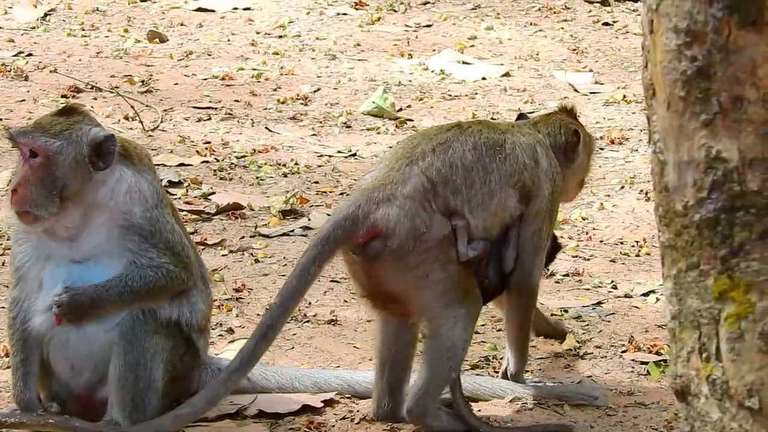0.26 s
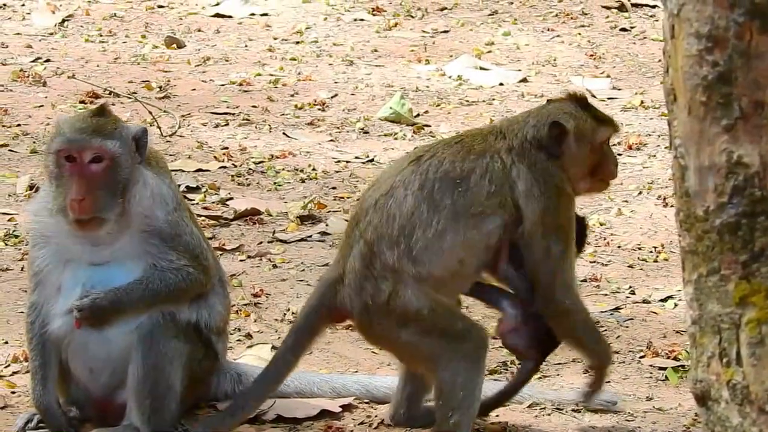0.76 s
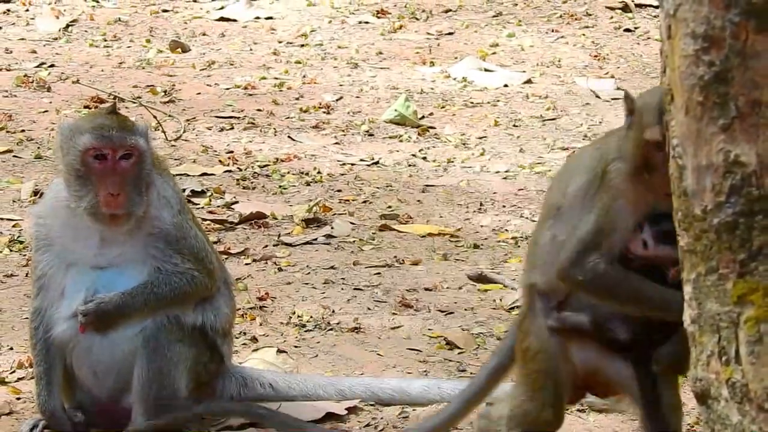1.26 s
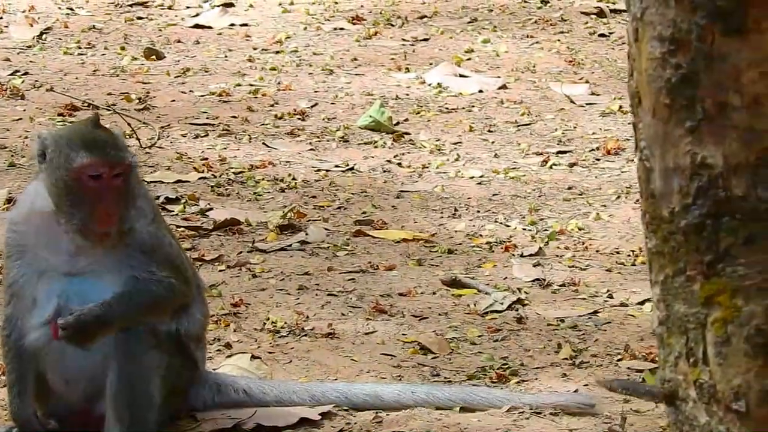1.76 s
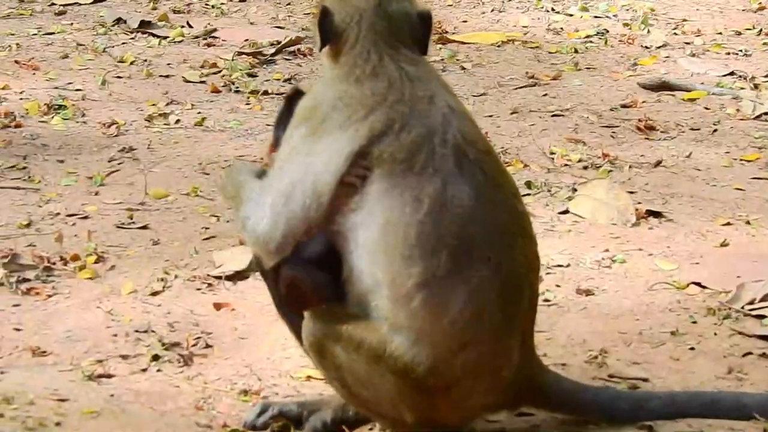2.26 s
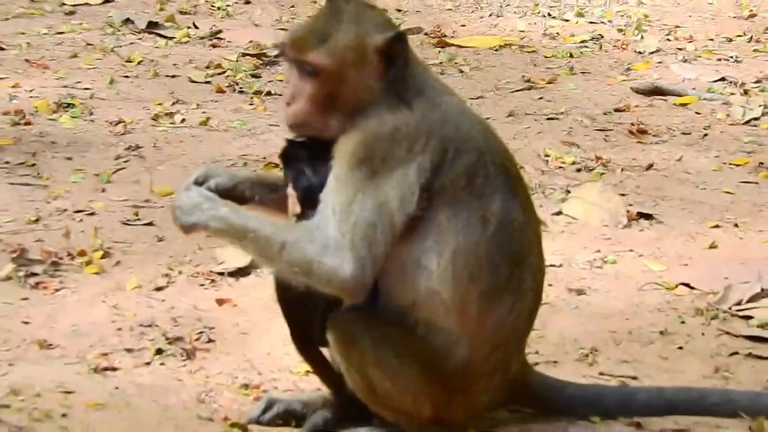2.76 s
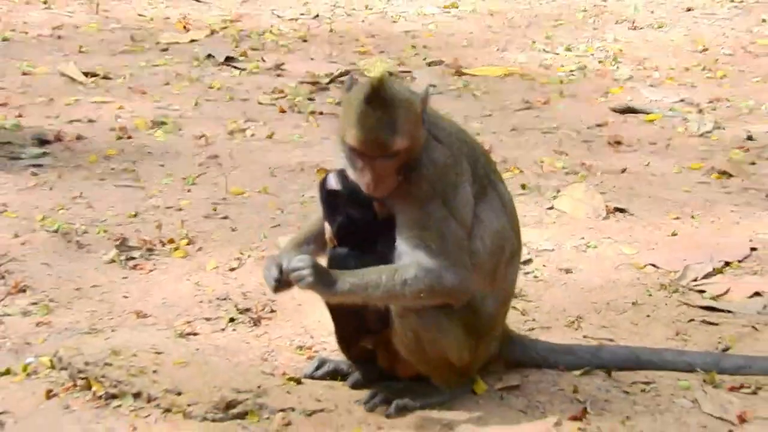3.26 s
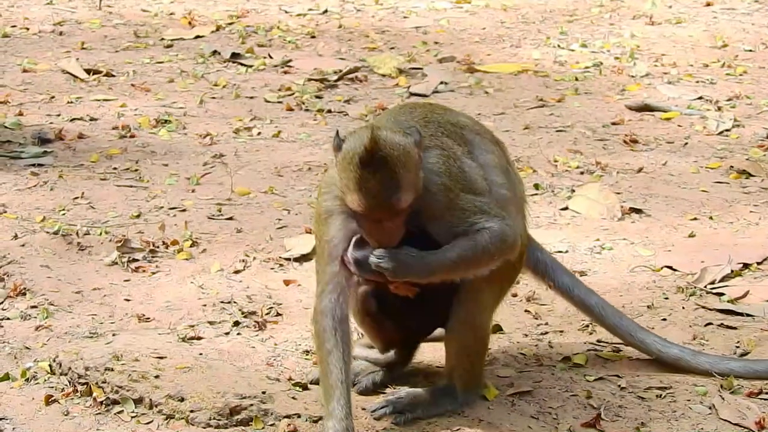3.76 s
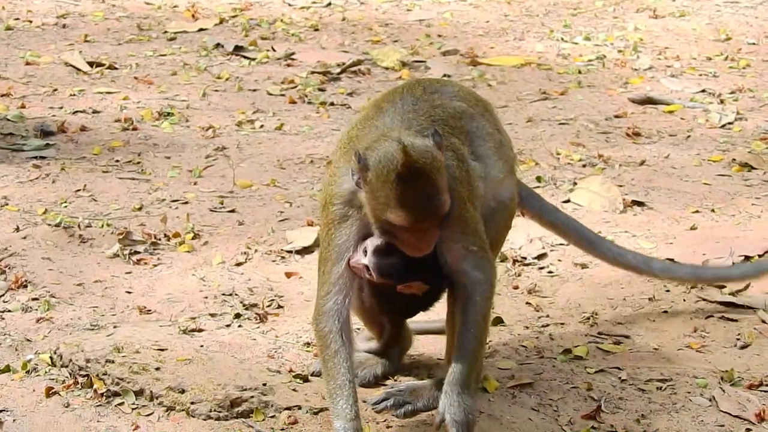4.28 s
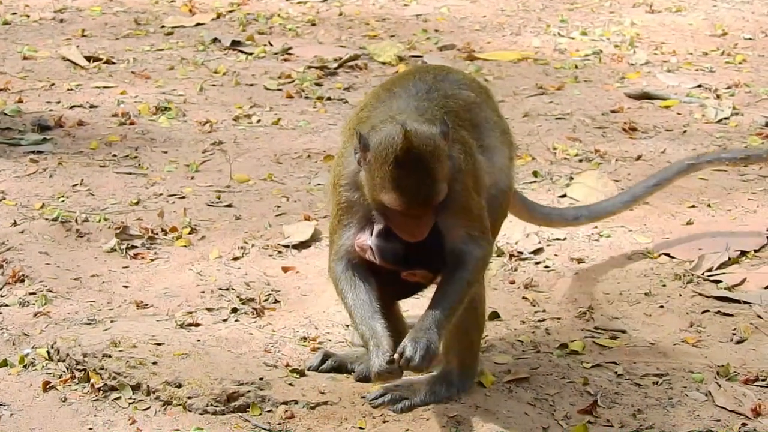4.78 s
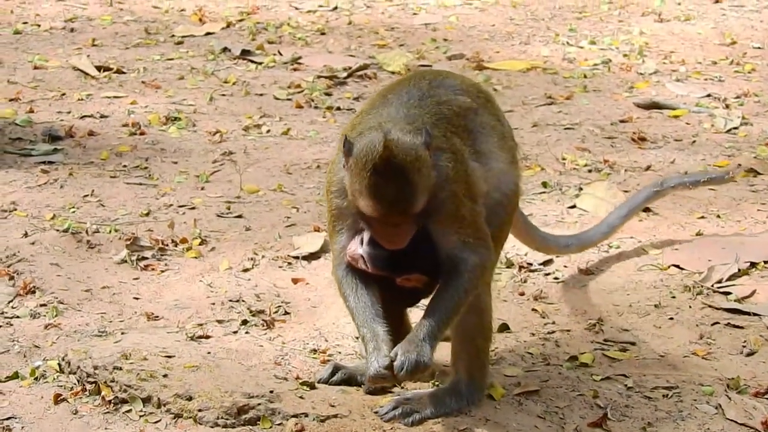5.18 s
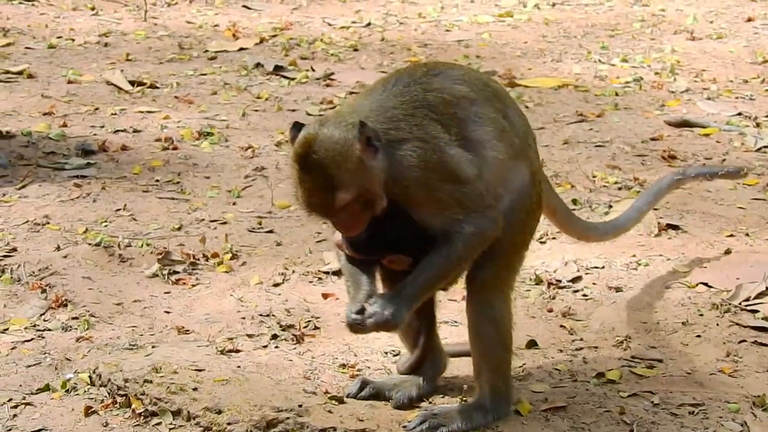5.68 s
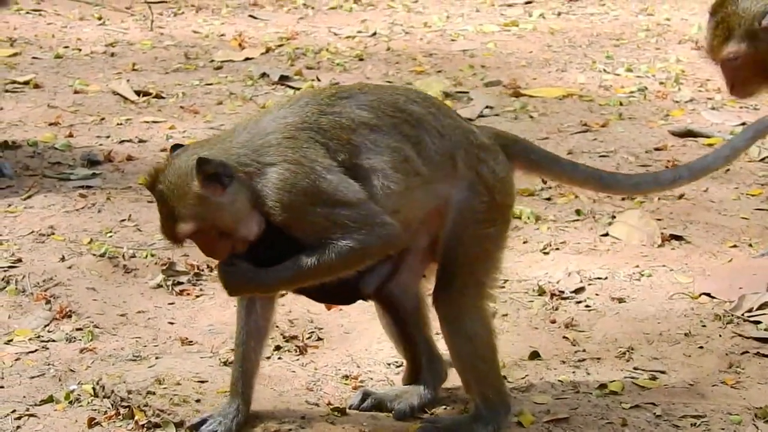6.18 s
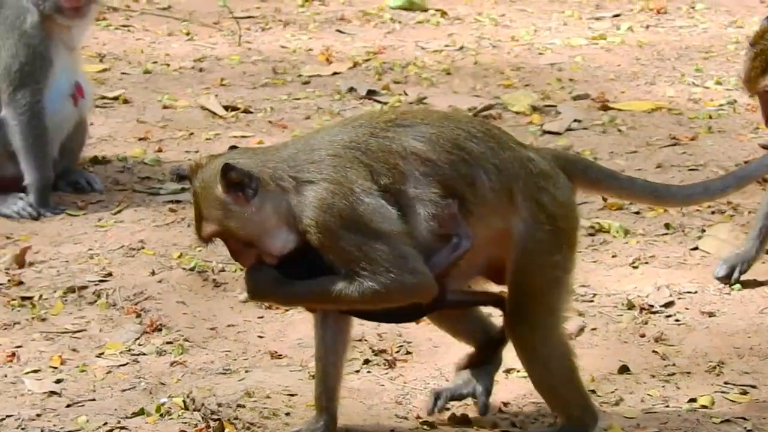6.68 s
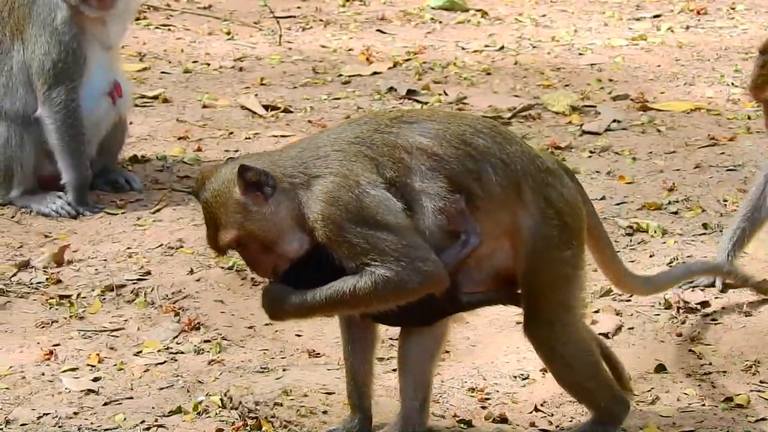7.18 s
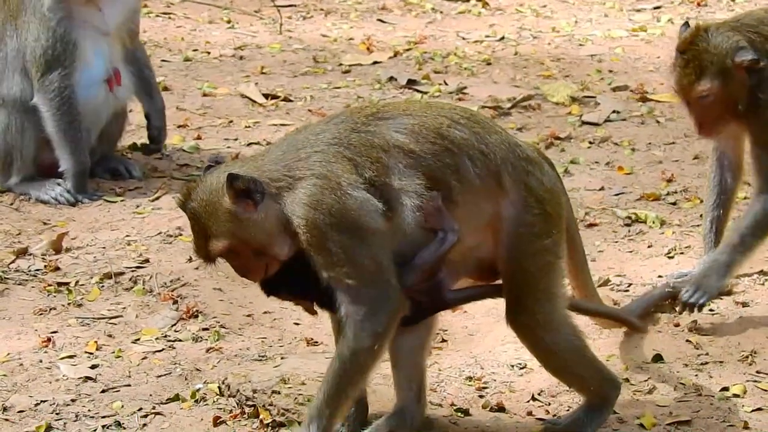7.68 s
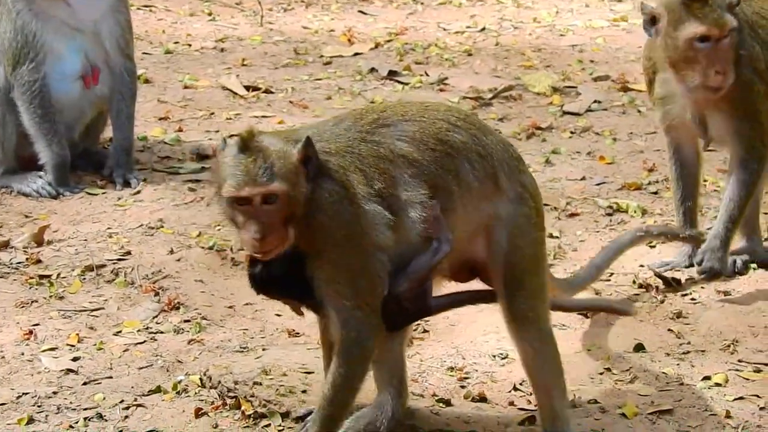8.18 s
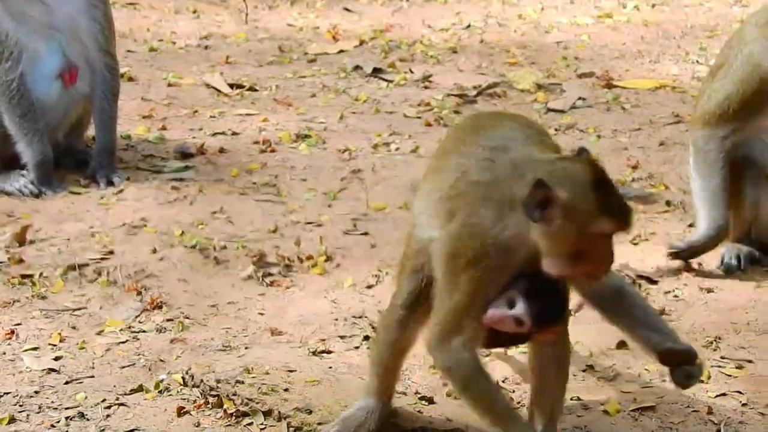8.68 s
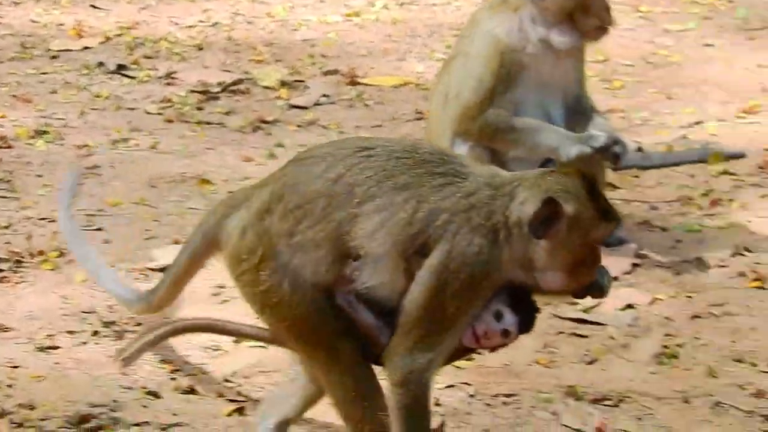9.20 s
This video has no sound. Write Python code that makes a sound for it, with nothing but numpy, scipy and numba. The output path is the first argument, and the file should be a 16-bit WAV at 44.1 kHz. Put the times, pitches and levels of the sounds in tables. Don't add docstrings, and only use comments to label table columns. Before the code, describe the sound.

Outdoor woodland in stereo: a steady low engine throb in the distance, dry leaf rustle and thin insect hiss. A young macaque shrieks and squeaks nearby, then everything drops silent briefly at a scene change. Denser screams and sliding whistles return, one turning into a voiced wail, with soft drooping coos further away. Another bout with a loud bark follows, then sharp twig cracks, quieter coos and a last dropping yelp.

```python
import sys
import numpy as np
from scipy import signal
from scipy.io import wavfile
from scipy.ndimage import uniform_filter1d
from numba import njit

SR = 44100
rng = np.random.default_rng(int(sys.argv[2]) if len(sys.argv) > 2 else 0)


def transcribe(signal):
    frames = np.atleast_2d(signal).T
    limited = np.clip(frames, -1, 1)
    pcm = np.round(limited * 32767).astype(np.int16)
    wavfile.write(sys.argv[1], SR, pcm)


def level_to_linear(level):
    exponent = np.asarray(level, float) / 20
    return 10 ** exponent


N = 416304


def rms_one(x):
    return x / np.sqrt(np.mean(x ** 2, axis=-1, keepdims=True) + 1e-20)


def at_hz(points, hz):
    table_hz, values = np.transpose(points)
    return np.interp(np.log(hz), np.log(table_hz), values)


def drift(rate_hz, size=N):
    r = np.exp(-2 * np.pi * rate_hz / SR)
    white = rng.standard_normal(size + 9000)
    slow = rms_one(signal.lfilter([1], [1, -2 * r, r * r], white))[9000:]
    return slow - slow.mean()


def butter(x, order, hz, kind="low"):
    return signal.sosfilt(signal.butter(order, hz, kind, fs=SR, output="sos"), x)


def unroll(call, fade_s):
    s, *columns = np.transpose(call)
    at = round(s[0] * SR)
    t = np.arange(at, min(round(s[-1] * SR), N)) / SR
    edges = np.clip(np.minimum(t - s[0], s[-1] - t) / fade_s, 0, 1)
    return at, edges, [np.interp(t, s, c) for c in columns]


@njit
def resonate(x, w, r):
    y = np.zeros(len(x))
    for i in range(2, len(x)):
        y[i] = x[i] - x[i - 2] + 2 * r * np.cos(w[i]) * y[i - 1] - r * r * y[i - 2]
    return y


def band(x, hz, width_hz, wander, tear_db, even_s=0.0054):
    hz = hz * np.exp(wander * drift(43, size=len(x)))
    w = 2 * np.pi * np.minimum(hz / SR, .4)
    for _ in range(2):
        x = resonate(x, w, np.exp(-np.pi * width_hz / SR))
    evened = x / np.sqrt(uniform_filter1d(x ** 2, int(even_s * SR)) + 1e-20)
    return level_to_linear(tear_db * drift(36, size=len(x))) * evened


def noisy_rings(rows, width_hz):
    out = np.zeros(N)
    for s, length, hz, db in rows:
        n, at = int(length * SR), round(s * SR)
        ring = band(rng.standard_normal(n), hz, width_hz, 0.03, tear_db=2.5)
        out[at:at + n] += level_to_linear(db) * np.hanning(n) ** .5 * ring
    return out


def voiced(calls, partials_db, waver=0.0039, flutter_db=5.5, fade_s=0.0027, smooth_s=.02,
           throat_db=0, dulling=0, flutter_hz=78, roll_db=0, roll_hz=7100):
    out = np.zeros(N)
    for call in calls:
        at, edges, (hz, db) = unroll(call, fade_s)
        n = len(hz)
        hz = uniform_filter1d(hz, int(smooth_s * SR) + 1, mode="nearest")
        hz = hz * (1 + waver * drift(60, size=n))
        phase = 2 * np.pi * np.cumsum(hz) / SR
        for k, partial_db in enumerate(partials_db, start=1):
            lift_db = throat_db / (1 + ((k * hz - 2400) / 200) ** 2)
            lift_db = lift_db - roll_db * np.maximum(k * hz - roll_hz, 0) / 1000 * (k > 1)
            effort_db = dulling * (k - len(partials_db)) * (db - db.max())
            level_db = db + partial_db + lift_db + effort_db + flutter_db * drift(flutter_hz, size=n)
            level = level_to_linear(level_db) * (k * hz < 16000)
            out[at:at + n] += np.sqrt(2) * edges * level * np.sin(k * phase + k * k)
    return out


def glides(rows, bend, start_db, end_db):
    out, u = [], np.linspace(0, 1, num=12)
    for s, length, from_hz, to_hz, db in rows:
        hz = from_hz + (to_hz - from_hz) * u ** bend
        level_db = db + start_db * (1 - u) ** 3 + end_db * u ** 3
        out.append(np.transpose([s + length * u, hz, level_db]))
    return out


# pitch_hz, density_db [dB per Hz]
AIR_DB = [(25, -26), (60, -10.5), (95, 5), (170, -5), (280, -22), (600, -22.5), (950, -28.5), (2500, -28.5),
          (3600, -29.5), (5600, -27.5), (7000, -31.5), (9000, -47), (16000, -37.5)]
# pitch_hz, likeness [0 to 1]
LIKENESS = [(60, .98), (250, .93), (600, .72), (1300, .74), (2400, .67), (4400, .52), (8000, .33),
            (15000, .05)]
# start_s, engine_nearness_db, tree_stir_db
AROUND = [(0, 2.5, -5), (1.761, 3, -5), (1.9, 0, 3), (3.4, 0, -0.5), (4.2, -3.5, -3.5), (4.9, -0.5, -2),
          (6.2, -4.5, -4), (8.14, -4.5, -4), (8.22, -4, -2), (8.5, -4.5, -6), (9.44, -5, -4.5)]


def surroundings(throb_hz=20.0, throb=0.37):
    t = np.arange(N) / SR
    before_gap = t < GAP_S[0]
    s, near_db, stir_db = np.transpose(AROUND)
    level_db = -43 + near_db, -54.5 + 0.78 * stir_db, -54 + 1.12 * stir_db
    edges = 25 * 2 ** np.arange(0, 9.4, 2 / 5)
    white = rng.standard_normal((2, 2, N))
    firing = 1 + throb * np.sin(2 * np.pi * np.cumsum(throb_hz * (1 + 0.042 * drift(1.0))) / SR)
    layers, gusts = np.zeros((3, 2, N)), drift(6.2)
    for k, (low, high) in enumerate(zip(edges, edges[1:])):
        mid, side = butter(white[k % 2], 2, [low, high], "band")
        hz = np.sqrt(low * high)
        alike = np.clip(at_hz(LIKENESS, hz), 0, 1)
        flicker_db = .7 * gusts + 1.9 * drift(9)
        shallow_db = -11.5 * before_gap / (1 + (hz / 107) ** 6)
        gain = level_to_linear(at_hz(AIR_DB, hz) + flicker_db) * level_to_linear(shallow_db)
        if hz < 300:
            gain = gain * firing
        stereo = np.sqrt(1 + alike) * mid + np.sqrt(1 - alike) * side * [[1], [-1]]
        layers[int(hz > 270) + int(hz > 2200)] += gain * stereo
    layers[2] = butter(layers[2], 3, 7600)
    lean_db = -1.0 + 0.1 * before_gap, -.6, -.4
    out = np.zeros((2, N))
    for layer, db, lean in zip(layers, level_db, lean_db):
        out += level_to_linear(np.interp(t, s, db)) * rms_one(layer) * level_to_linear(lean * np.array([[1], [-1]]))
    return out


def rustles(per_s=14, level_db=-62):
    out, t = np.zeros((2, N + 2048)), np.arange(2048) / SR
    for when, pitch, size, side, length in rng.random((200, 5))[:int(per_s * N / SR)]:
        hz, at = 350 * 2 ** (4.0 * pitch), int(when * N)
        puff = rms_one(butter(rng.standard_normal(2048), 2, [hz / 1.5, hz * 1.34], "band"))
        decay_db = -60 * t / (0.068 + .08 * length)
        puff = puff * level_to_linear(level_db + 13 * size ** 2 + decay_db) * np.clip(t / 0.0019, 0, 1)
        out[:, at:at + 2048] += puff * level_to_linear(14 * (side - .5) * np.array([[1], [-1]]))
    return out[:, :N]


# start_s, length_s, pitch_hz, level_db
CHEST = [
    (.508, 0.028, 3200, -41),
    (0.51, .05, 3500, -47.5),
    (0.68, .03, 2100, -55.5),
    (0.411, 0.031, 3230, -38.5),
    (1.254, 0.052, 3420, -35),
    (6.11, 0.026, 2850, -30.5),
    (6.193, 0.016, 2000, -38),
    (7.605, 0.036, 2600, -46),
    (8.912, 0.017, 3750, -47),
]


def chest_rings():
    return noisy_rings(CHEST, 450)


# start_s, length_s, level_db, mouth_hz, airy_top_db [above the mouth]
SHRIEKS = [(0.423, .07, -29, 6020, -10), (0.487, 0.04, -30.5, 6420, -12), (0.599, 0.033, -30, 5970, -7.5),
           (0.64, .048, -35, 5990, -7), (0.686, 0.11, -45.5, 6330, 1), (1.031, 0.052, -41, 5970, 1.5),
           (1.136, 0.057, -52.5, 6440, 13), (1.259, 0.033, -27, 5270, -14), (1.962, 0.041, -37, 6120, 2),
           (2.382, 0.026, -38, 6840, -2), (2.418, 0.017, -28, 6400, -1.5), (2.528, 0.045, -28.5, 5690, -18),
           (2.617, 0.068, -34.5, 5850, -1), (2.904, 0.039, -30, 6070, -2.5), (2.945, 0.059, -39, 6360, 4),
           (3.017, .06, -29.5, 5810, -11), (3.085, 0.12, -35.5, 5550, -16),
           (3.426, 0.031, -30.5, 5900, -10), (3.481, 0.027, -25, 6100, -16), (3.518, 0.033, -34, 5750, -9),
           (3.564, .04, -31.5, 6510, -16), (6.119, 0.027, -33.5, 5640, -38),
           (6.198, 0.024, -31.5, 5960, -17), (6.475, 0.092, -34.5, 6100, 3),
           (6.562, 0.084, -36, 6180, -7.5), (6.731, 0.14, -51, 7100, -9), (7.592, 0.034, -40, 6750, -4),
           (8.908, 0.018, -39.5, 5850, -12)]
# start_s, length_s, level_db, throat_hz, slide_octaves
RASPS = [(0.419, 0.018, -33.5, 3660, 0.47), (0.447, 0.037, -46.5, 4440, -0.082),
         (0.516, 0.036, -26, 4500, -0.039), (0.564, 0.049, -39.5, 4180, -0.026),
         (1.031, 0.044, -48.5, 3650, -0.032), (2.068, 0.015, -40, 4230, -0.061),
         (2.41, 0.026, -43, 3620, 0.015), (2.521, 0.063, -35, 3510, 0.29),
         (2.642, 0.036, -28, 4760, -0.099), (2.911, 0.027, -39, 3530, 0.023),
         (3.015, 0.051, -29, 3400, 0.23), (3.06, 0.11, -33.5, 4120, -0.12),
         (3.493, 0.056, -29.5, 3670, 0.062), (3.544, 0.056, -28.5, 3670, 0.041),
         (6.113, 0.038, -35, 3620, 0.35), (6.187, 0.02, -21.5, 3690, 0.035),
         (6.497, 0.03, -26, 4160, -0.041), (6.58, 0.05, -27, 3990, -0.019), (1.259, .03, -31.5, 4610, -.05),
         (6.733, 0.11, -46, 3920, 0.13), (6.826, 0.016, -27, 4320, 0.0069),
         (7.586, 0.037, -37.5, 3750, -0.058), (8.905, 0.022, -38.5, 2470, 0.04)]


def pushes():
    out, one = [], np.ones(4)
    shape_db = np.array([-13.5, 0, -3.5, -22])
    release_s = 0.0074
    attack_s, throat_db, throat_hz = 0.0063, -9, 4500
    for s, length, db, hz, top_db in SHRIEKS:
        t = s + np.array([0, attack_s, max(length - release_s, 1.2 * attack_s), length + release_s])
        out.append(np.transpose([t, db + throat_db + shape_db, throat_hz * one,
                                 -throat_db * one, hz * one, (top_db - throat_db) * one]))
    attack_s, mouth_ratio, mouth_db, top_db = 0.0094, 1.302, -6.5, -29.5
    for s, length, db, hz, slide in RASPS:
        t = s + np.array([0, attack_s, max(length - release_s, attack_s), length + release_s])
        hz = hz * 2 ** (slide * (t - s) / length)
        out.append(np.transpose([t, db + shape_db, hz, mouth_db * one, mouth_ratio * hz, top_db * one]))
    return out


def screams(slaps_hz=520, uneven=.3, breath=0.42):
    out = np.zeros(N)
    for push in pushes():
        at, edges, (db, low_hz, mouth_db, mouth_hz, top_db) = unroll(push, 0.0015)
        n = len(edges)
        cycle = np.cumsum(slaps_hz * np.exp(uneven * drift(150, size=n))) / SR
        slaps = np.diff(np.floor(cycle), prepend=0) * level_to_linear(2.0 * drift(260, size=n))
        gated_breath = breath * 3 * rng.standard_normal(n) * np.exp(-2.5 * (cycle % 1))
        source = rms_one(slaps) + gated_breath
        voice = level_to_linear(1.5) * band(source, low_hz, 500, 0.025, tear_db=2.5)
        voice += level_to_linear(mouth_db - 0.5) * band(source, mouth_hz, 520, 0.05, tear_db=5.0)
        voice += level_to_linear(mouth_db - 7.0) * band(source, 1.136 * mouth_hz, 420, 0.056, tear_db=2.0)
        voice += level_to_linear(top_db - 7.5) * band(source, 8800, 1200, 0.071, tear_db=-1.0)
        voice += level_to_linear(top_db - 19) * band(source, 12000, 2500, .03, tear_db=3.0)
        out[at:at + n] += edges * level_to_linear(db) * voice
    return out


# start_s, peak_db, centre_hz
SNAPS = [(.427, -35, 8950), (0.521, -33, 6900), (.632, -22, 6300), (0.83, -40.5, 1270), (1.5, -56, 6030),
         (3.486, -25, 6450), (3.52, -37, 7140), (3.565, -28, 8000), (3.872, -32, 4500), (3.892, -54, 9100),
         (5.298, -40, 5100), (6.842, -31.5, 2080), (6.892, -40, 350), (8.179, -41, 1790), (2.74, -36, 686),
         (2.742, -43, 2000), (3.035, -27, 1280), (3.356, -35.5, 620), (6.194, -49, 8100),
         (6.323, -42, 2170), (6.333, -56, 6100), (6.968, -29.5, 1000), (6.968, -29, 2300),
         (6.978, -14.5, 5400), (7.244, -49, 5830), (7.475, -25, 2300), (7.475, -33.5, 940),
         (7.486, -16.5, 5030), (7.498, -19.5, 4930), (7.901, -40, 2170), (8.737, -40.5, 280),
         (8.738, -30.5, 1040), (8.741, -37.5, 2600), (8.748, -32, 4400), (9.022, -39.5, 900),
         (8.032, -47, 993), (7.235, -36, 2315), (7.46, -46, 5500), (0.765, -37, 3800), (6.215, -45, 449)]


def snaps(t60_s=0.0067, cycles=41.0, spread=1.494):
    out, t = np.zeros(N), np.arange(2048) / SR
    for s, db, hz in SNAPS:
        at = round(s * SR)
        blow = rng.standard_normal(2048) + 6 * (t == 0)
        blow = blow * level_to_linear(-60 * t / (t60_s + cycles / hz))
        burst = butter(blow, 3, [hz / spread, min(hz * spread, 16000)], "band")
        out[at:at + 2048] += level_to_linear(db) * burst / np.abs(burst).max()
    return out


# start_s, pitch_hz, level_db
TRILLS = [
    [(.432, 5900, -35.5), (.455, 6880, -31), (.468, 6180, -34), (.482, 4600, -34)],
    [(.8, 7570, -60), (.845, 8180, -50), (.87, 7550, -45), (.888, 7430, -43)],
    [(1.09, 9000, -56), (1.105, 10130, -56.5), (1.12, 10100, -50.5), (1.14, 11970, -42)],
    [(1.198, 11300, -41), (1.208, 11470, -40.5), (1.228, 9700, -48.5), (1.254, 9700, -47.5),
     (1.262, 6800, -50)],
    [(1.535, 6250, -56), (1.545, 6600, -48), (1.55, 8100, -71), (1.558, 6200, -53)],
    [(1.957, 9750, -38), (1.97, 8650, -51)],
    [(1.968, 7900, -41), (1.985, 8100, -47), (2.0, 7770, -41), (2.012, 8400, -48), (2.027, 7300, -43),
     (2.05, 8300, -35.5), (2.068, 8100, -46), (2.082, 9300, -50)],
    [(2.085, 6700, -59), (2.105, 7100, -57)],
    [(2.632, 8380, -33), (2.665, 6200, -40), (2.688, 4670, -42)],
    [(2.915, 9000, -45), (2.935, 10300, -47), (2.965, 10800, -49)],
    [(3.06, 11500, -52), (3.095, 10200, -50)],
    [(3.438, 4750, -41), (3.447, 4300, -27.5), (3.463, 4280, -36), (3.47, 4780, -43)],
    [(3.485, 5990, -30), (3.49, 7970, -37), (3.5, 7200, -43)],
    [(3.545, 8200, -42), (3.562, 8910, -42)],
    [(2.6, 4000, -44), (2.64, 3990, -45)],
    [(4.25, 6930, -65), (4.285, 6600, -46), (4.32, 5800, -47), (4.355, 4950, -53), (4.39, 5100, -46)],
    [(8.257, 7100, -59), (8.285, 6440, -50), (8.325, 5830, -53), (8.362, 4700, -61)],
    [(7.172, 6150, -52), (7.188, 5700, -52)],
    [(1.05, 6300, -41.5), (1.075, 6850, -43.5), (1.1, 7700, -53)],
]
# start_s, pitch_hz, level_db
CRESTS = [
    [(2.46, 9600, -54), (2.488, 11800, -56), (2.505, 11300, -59), (2.53, 9600, -55)],
    [(2.565, 7700, -48), (2.6, 8700, -46), (2.608, 10000, -41.5), (2.622, 9240, -46), (2.632, 8300, -42)],
    [(6.748, 8000, -53), (6.768, 8800, -45), (6.79, 8100, -50), (6.822, 7800, -46)],
    [(6.73, 6900, -35), (6.745, 7160, -35)],
]


def winding_whistles():
    return voiced(TRILLS + CRESTS, [0], waver=.011, flutter_db=4.0, fade_s=.002, smooth_s=.005)


# start_s, pitch_hz, level_db [tenth partial]
WHINES = [
    [(.71, 943, -53.5), (.78, 912, -65)],
    [(1.13, 912, -49.5), (1.15, 923, -46), (1.165, 960, -49.5), (1.185, 965, -47.5), (1.2, 968, -51)],
    [(2.975, 975, -52), (2.997, 1000, -47), (3.018, 954, -52)],
    [(6.488, 1046, -41), (6.52, 1005, -63), (6.555, 956, -52)],
]
WHINE_PARTIALS_DB = [-24.5, -14.5, -16.5, -4.5, -8.5, -5.5, -5, -11.5, -11, -4, -2.5, -7, -22, -15]


def whines():
    return voiced(WHINES, WHINE_PARTIALS_DB, waver=.012, flutter_db=6.5, fade_s=.006)


# start_s, pitch_hz, level_db [third partial]
BARKS = [
    [(6.103, 1059, -51), (6.115, 991, -36), (6.13, 970, -32), (6.143, 940, -40)],
    [(1.252, 872, -57.5), (1.268, 883, -48), (1.285, 860, -57.5)],
    [(7.6, 1188, -58), (7.615, 1130, -48), (7.63, 1080, -54)],
]
BARK_PARTIALS_DB = [-29, -0.5, -2.5, -3, -5.5, -3.5, -7.5, -21.5]


def barks():
    return voiced(BARKS, BARK_PARTIALS_DB, dulling=-0.11, waver=.02, flutter_db=2.0,
                  fade_s=0.0043, smooth_s=.004)


# start_s, length_s, from_hz, to_hz, level_db
FALLS = [(1.595, 0.026, 7320, 5500, -48.5), (1.968, 0.044, 6310, 6030, -30), (2.11, .05, 8050, 7370, -54),
         (2.16, 0.023, 7400, 5960, -49), (2.618, 0.03, 5570, 5000, -32), (2.658, 0.02, 3570, 2930, -38),
         (3.18, 0.027, 5040, 3400, -34), (3.575, 0.028, 2570, 1615, -43), (6.195, 0.018, 2420, 1850, -34.5),
         (6.605, 0.021, 2660, 1550, -44), (6.77, 0.0266, 6640, 6380, -35), (2.668, 0.0176, 5540, 4500, -39),
         (6.77, 0.069, 10500, 8730, -54), (7.163, 0.034, 2090, 1400, -44.5),
         (8.905, 0.014, 2910, 2270, -41)]


def falling_whistles():
    slides = glides(FALLS, bend=1.4, start_db=-6, end_db=-6.5)
    return voiced(slides, [0], waver=0.013, flutter_db=5.0, fade_s=0.0019, smooth_s=0.0021)


# start_s, length_s, pitch_hz, level_db
FAR_SCREAMS = [
    (8.175, 0.08, 6400, -58),
    (8.32, .16, 5900, -63.5),
    (8.665, .035, 3440, -58),
    (1.8, .11, 6300, -62),
    (1.62, 0.11, 4850, -60.5),
    (1.68, .03, 6100, -52.5),
    (6.2, 0.086, 6400, -58),
    (4.3, .2, 6100, -56.5),
]


def far_screams():
    return noisy_rings(FAR_SCREAMS, 1050)


# start_s, pitch_hz, level_db
DISTANT = [
    [(1.96, 1633, -60), (2.3, 1616, -61)],
    [(2.9, 975, -59), (3.25, 948, -68)],
    [(3.05, 1606, -62.5), (3.42, 1540, -66)],
    [(4.22, 1993, -56), (4.48, 1936, -64)],
    [(4.68, 1992, -54), (5.02, 2000, -73)],
]


def distant_notes():
    return voiced(DISTANT, [0], waver=.012, flutter_db=5.5, fade_s=.03, flutter_hz=35)


# start_s, length_s, held_pitch_hz, droop [share of pitch], level_db [fourth partial]
COOS = [(2.052, 0.23, 890.5, 0.085, -48.5), (3.405, 0.1, 831, 0.031, -49.5),
        (3.604, 0.21, 919.3, 0.15, -46), (4.243, 0.225, 860, 0.08, -50.5), (4.494, 0.23, 929, 0.11, -46),
        (5.329, 0.24, 876, 0.12, -48.5), (6.35, 0.24, 862, 0.11, -49.5), (6.668, 0.24, 929.6, 0.16, -46.5),
        (7.141, 0.19, 1044, 0.03, -54), (7.223, 0.27, 876, 0.14, -51), (8.85, 0.17, 938.4, 0.0056, -50.5),
        (9.007, .22, 957, 0.13, -44.5)]
COO_PARTIALS_DB = [-24.5, -15.5, -10, 0, -25, -9.5, -18, -14.5, -20, -26, -44, -42, -39, -39, -34, -31]


def arches(rise_s=.031, fall_s=.035, onset_db=16.0, onset_s=.028, sag_db=4.0):
    out = []
    for start, length, hz, fall, db in COOS:
        end = start + length
        rise = .1 + .8 * fall
        s = np.linspace(start, end, num=24)
        sag = rise * np.exp((start - s) / rise_s) + fall * np.exp((s - end) / fall_s)
        fade_db = onset_db * np.exp((start - s) / onset_s) + sag_db * ((s - start) / length) ** 2
        out.append(np.transpose([s, hz * (1 - sag), db - fade_db]))
    return out


def coos():
    voice = voiced(arches(), COO_PARTIALS_DB, waver=.002, flutter_db=5.0, fade_s=.008, smooth_s=.004,
                   throat_db=8.0, dulling=.06, flutter_hz=22, roll_db=4)
    hiss = band(rng.standard_normal(N), 5800, 1800, 0, tear_db=2.0)
    return voice + level_to_linear(-17) * uniform_filter1d(np.abs(voice), 512) * hiss


# start_s, length_s, from_hz, to_hz, level_db
RISES = [(2.065, 0.0155, 5680, 6720, -31.5), (2.378, 0.02, 4600, 6660, -27), (2.572, 0.03, 4400, 6720, -29),
         (2.386, 0.02, 6600, 9400, -38), (2.887, 0.028, 4170, 8900, -24), (3.411, 0.026, 4500, 6440, -22),
         (6.45, 0.012, 4500, 5600, -28), (6.462, 0.023, 5500, 8300, -24), (6.698, 0.017, 5900, 8140, -35),
         (6.725, 0.0125, 9250, 11400, -44), (6.703, 0.03, 4040, 4770, -25),
         (6.728, 0.012, 4900, 7400, -28),]


def rising_whistles():
    slides = glides(RISES, bend=0.94, start_db=-3, end_db=-14.0)
    return voiced(slides, [0, -31], roll_hz=10500, waver=0.018, flutter_db=4.0, fade_s=0.0012, smooth_s=0.0015)


# start_s, pitch_hz, level_db [third partial]
WAIL = [
    [(3.065, 1320, -37.5), (3.1, 1240, -33.5), (3.13, 1239, -35), (3.165, 1262, -34.5), (3.197, 1048, -35)],
]
WAIL_PARTIALS_DB = [-31, -34, 1, -6.5, 0, -10.5, -18, -29, -26, -29]


def wail():
    return voiced(WAIL, WAIL_PARTIALS_DB, roll_db=0.5, waver=0.015, flutter_db=3.0,
                  fade_s=0.0053, smooth_s=0.0069)


# start_s, pitch_hz, level_db
HOARSE = [
    [(3.75, 1160, -65), (4.2, 1123, -75)],
    [(4.8, 1104, -62), (5.25, 1057, -70.5)],
]


def hoarse_calls():
    return voiced(HOARSE, [0], waver=.06, flutter_db=5.0, fade_s=.08)


# start_s, pitch_hz, level_db [first partial]
YELP = [
    [(9.215, 1575, -57), (9.237, 1970, -33), (9.252, 2083, -45), (9.268, 1988, -35), (9.285, 1780, -42)],
    [(9.275, 1683, -47), (9.312, 1140, -52), (9.36, 923, -85)],
    [(9.4, 1020, -75), (9.41, 980, -80), (9.44, 1046, -50)],
]


def yelp():
    return voiced(YELP, [-2, -1.5, 1.0, -22, -26, -36, -34], waver=0.0045, flutter_db=1.5,
                  fade_s=0.0048, smooth_s=0.012, dulling=0.12)


# t60_s, level_db
NEAR_ECHO = [(0.2, -1.5), (1.0, -10)]
# t60_s, level_db
FAR_ECHO = [(.3, 5.3), (1.5, 2.7)]


def wood(x, echo_table, sway, wide_hz=4500, wide_db=-7.0, narrow_db=-9):
    t = np.arange(2 * SR) / SR
    white = rng.standard_normal((2, len(t)))
    lows = butter(white, 2, 7000)
    colour = lows + (white - lows) * level_to_linear(-90 * t)
    mid, side = sum(level_to_linear(db - 60 * t / t60) * colour for t60, db in echo_table)
    side = level_to_linear(narrow_db) * side + level_to_linear(wide_db) * butter(side, 2, wide_hz, "high")
    echo = np.array([mid + side, mid - side]) * np.clip(t / 0.0038, 0, 1) * level_to_linear(-35.0)
    x = x * (1 + sway * drift(22)) / np.sqrt(1 + sway ** 2)
    return signal.fftconvolve(x[None], echo, axes=1)[:, :N]


def scene():
    near = chest_rings() + screams() + winding_whistles() + whines() + barks()
    near += falling_whistles() + rising_whistles() + wail() + yelp()
    far = far_screams() + distant_notes() + coos() + hoarse_calls()
    direct = (near + far + snaps()) * level_to_linear(np.array([[-.3], [.3]]))
    voices = np.array([near, far])
    near, far = level_to_linear(-5.5) * voices + butter(voices, 4, 3100, "high")
    echoes = wood(near, NEAR_ECHO, 0.66) + wood(far, FAR_ECHO, 0.34)
    return direct + echoes + surroundings() + rustles()


def band_limit(x):
    return signal.sosfilt(signal.butter(12, 15800, fs=SR, output="sos"), x)


# start_s, end_s
GAP_S = (1.711, 1.956)


def record(dry):
    t = np.arange(N) / SR
    x = .28 * np.tanh(dry / .28)
    x = butter(x, 5, 13000) + level_to_linear(-83) * rng.standard_normal(x.shape)
    x = x * np.clip(np.maximum(GAP_S[0] - t, t - GAP_S[1]) / 0.0014, 0, 1)
    return band_limit(x)


dry = scene()
out = record(dry)
transcribe(out)
```